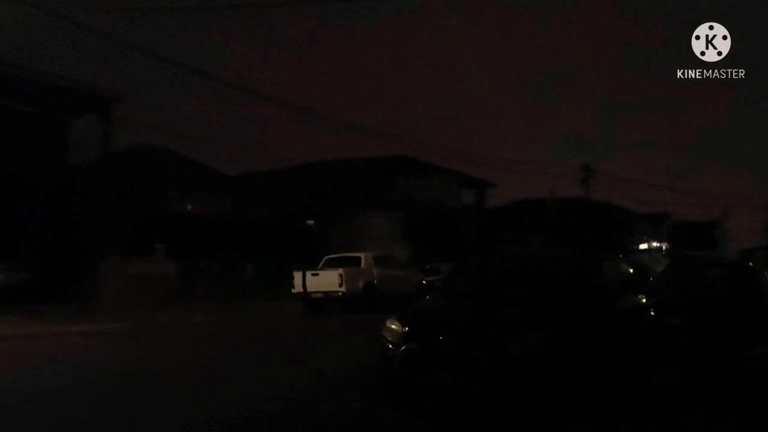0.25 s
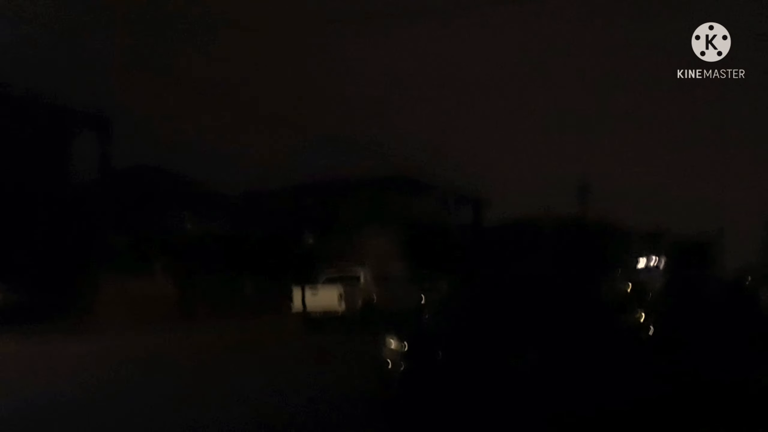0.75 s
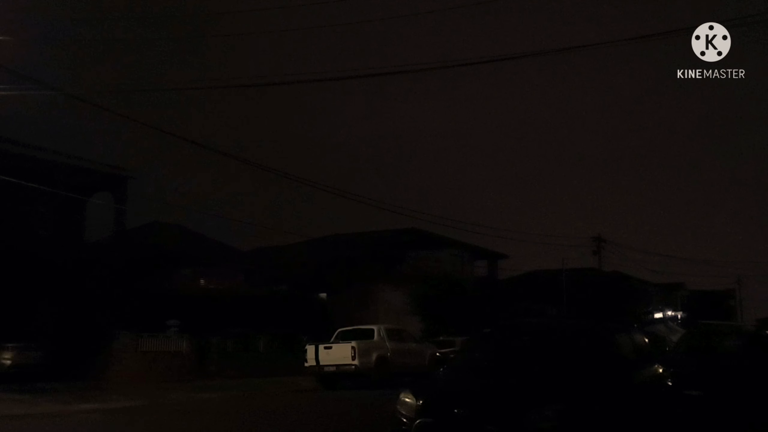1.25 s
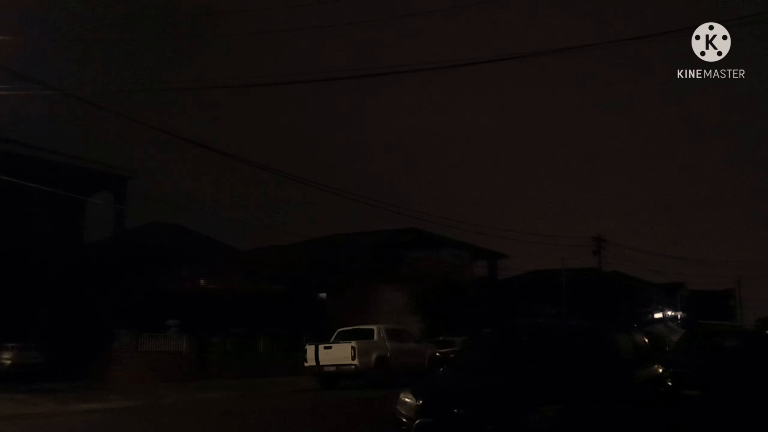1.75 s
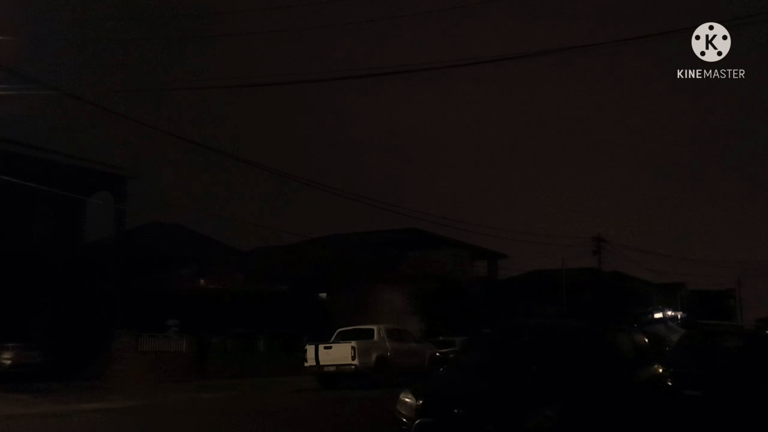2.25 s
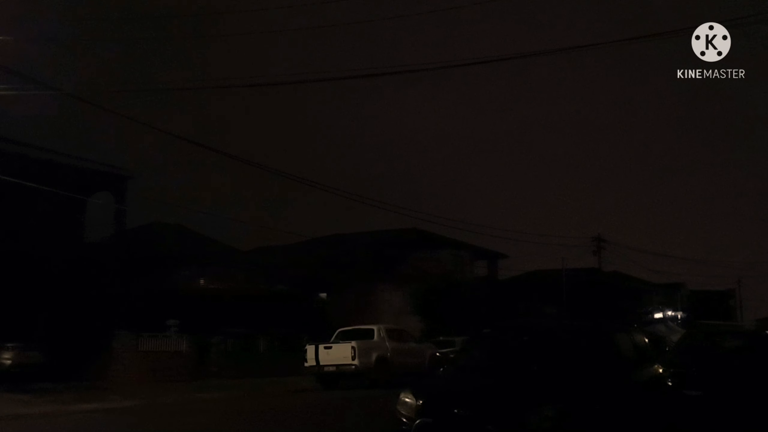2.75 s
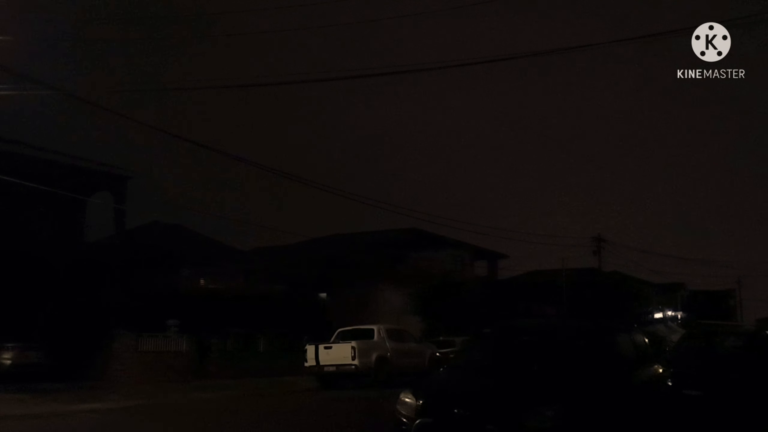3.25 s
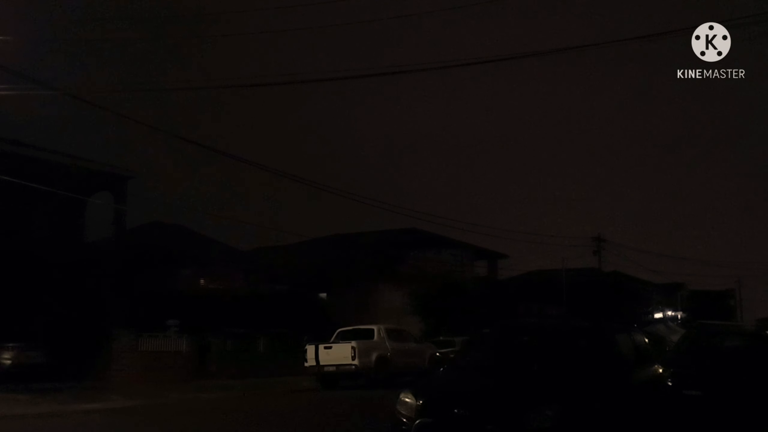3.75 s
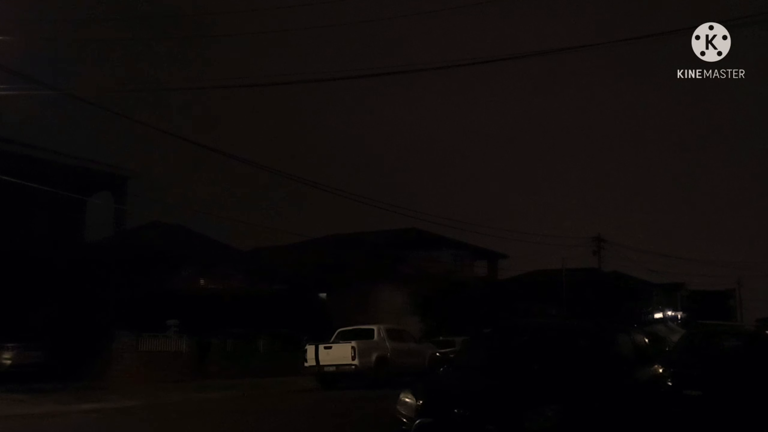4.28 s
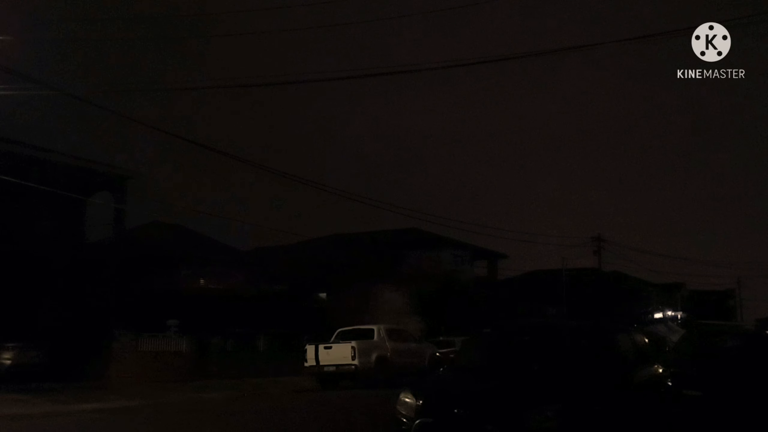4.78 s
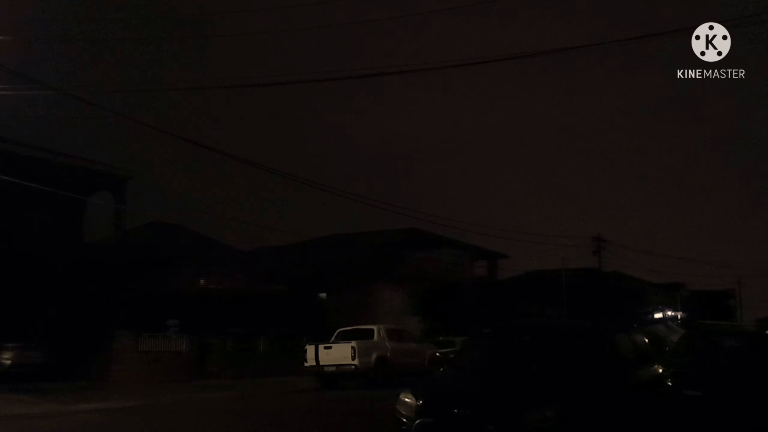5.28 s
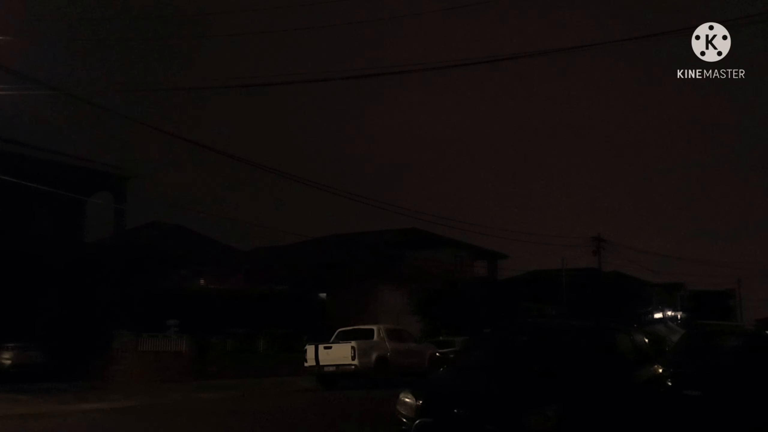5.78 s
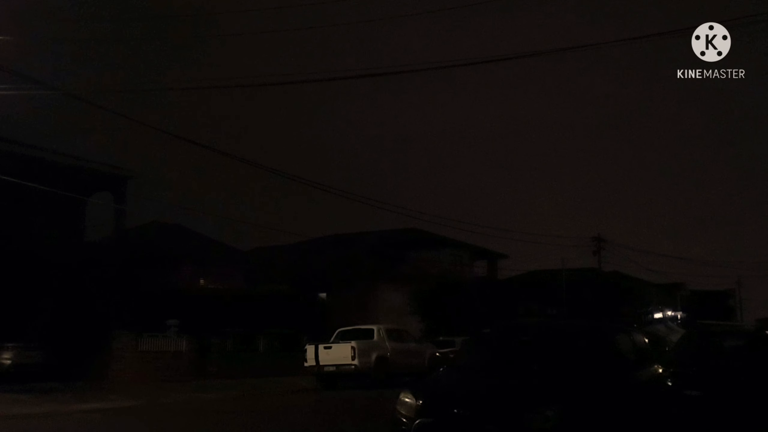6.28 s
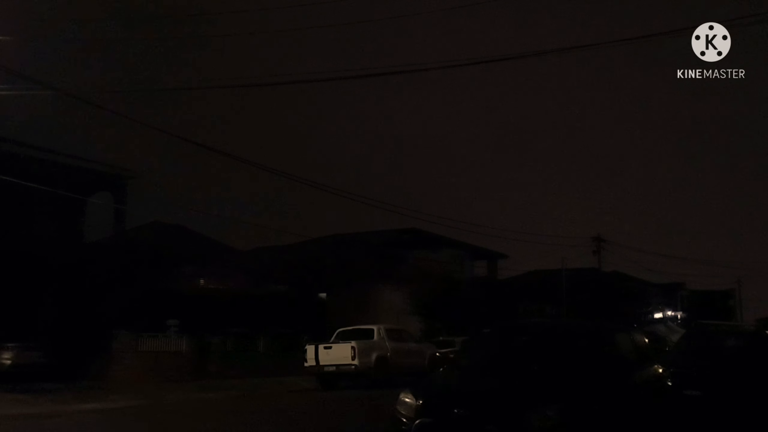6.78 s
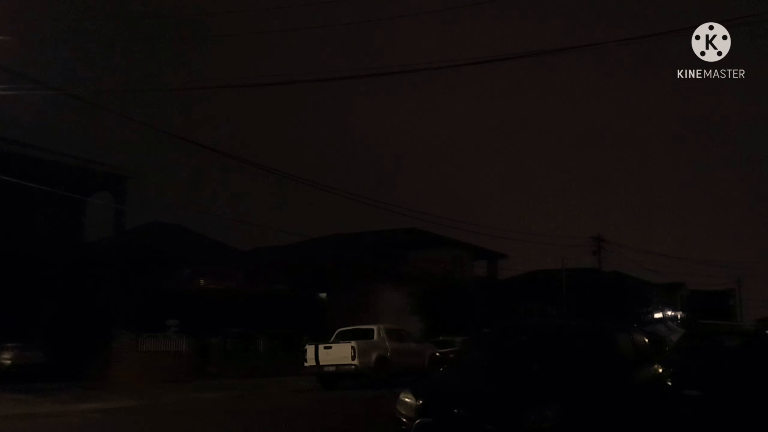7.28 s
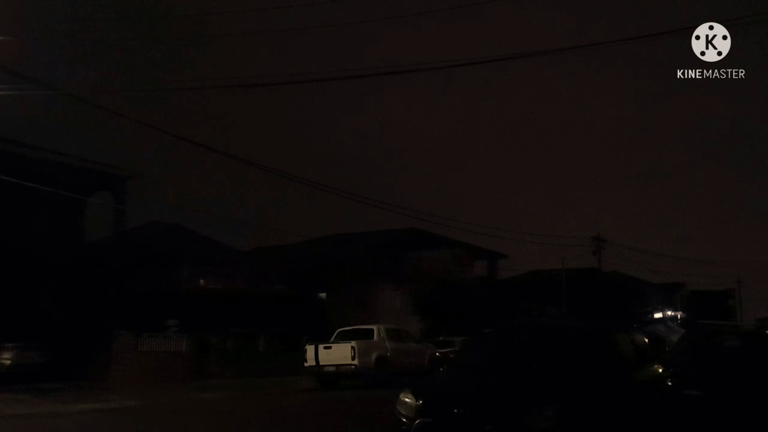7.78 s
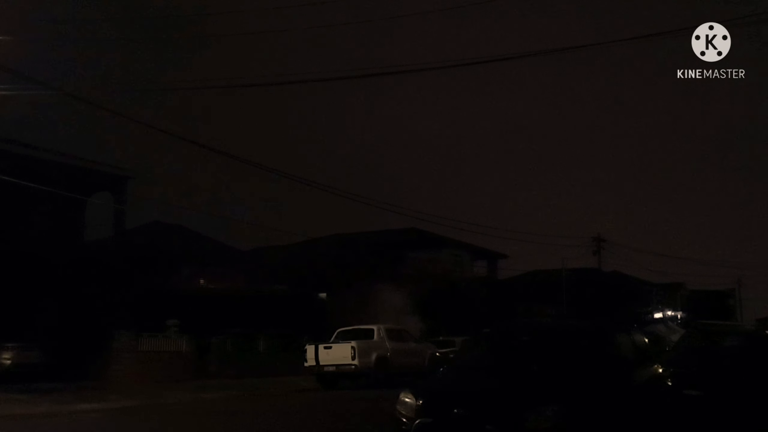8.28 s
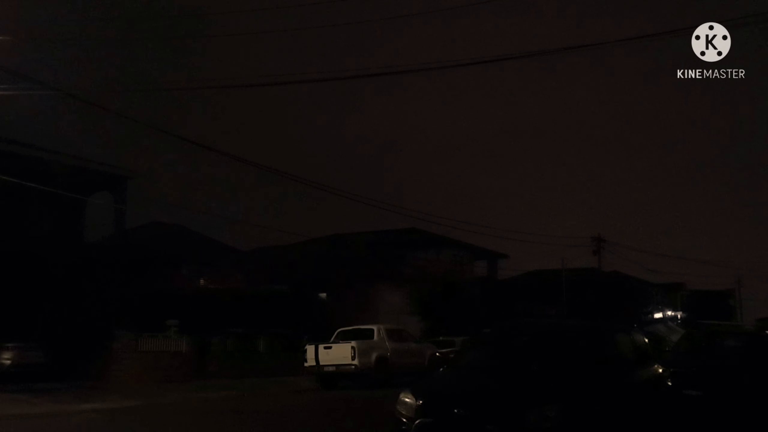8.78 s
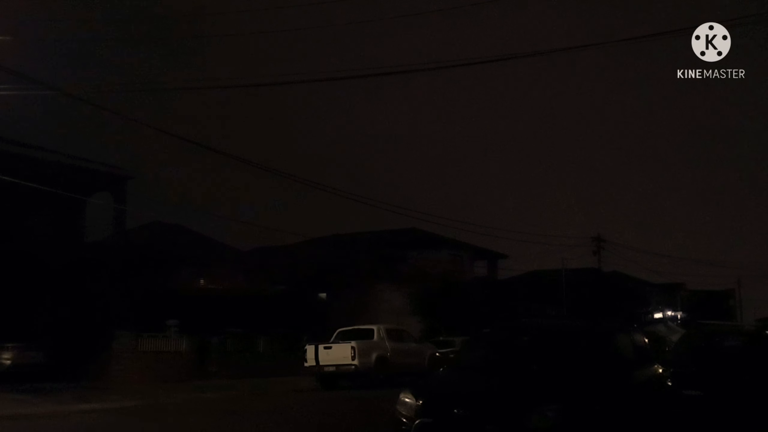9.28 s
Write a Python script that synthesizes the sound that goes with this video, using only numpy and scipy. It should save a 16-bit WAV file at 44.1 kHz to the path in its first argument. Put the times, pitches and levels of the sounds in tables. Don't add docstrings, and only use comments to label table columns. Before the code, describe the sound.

Fat raindrops knock on a thin roof close overhead while distant thunder swells, booms deeply and rolls away over a quiet night street.

```python
import sys
import numpy as np
from scipy import signal
from scipy.fft import rfft, irfft, next_fast_len
from scipy.io import wavfile
from scipy.ndimage import uniform_filter1d

SR = 44100
rng = np.random.default_rng(int(sys.argv[2]) if len(sys.argv) > 2 else 0)


def invert_db(x):
    u = np.asarray(x, float) / 20
    return 10 ** u


def int16_out(signal):
    q = np.round(np.clip(np.atleast_2d(signal).T, -1, 1) * 32767)
    wavfile.write(sys.argv[1], SR, q.astype(np.int16))


N = 420273
TIME = np.arange(N) / SR


def thunder():
    # [hz, level_db per Hz]
    deep_colour = [(15, -18), (25, -79), (47, -2), (70, 1.5), (130, -2), (215, -7.5), (280, -38),
                   (470, -120)]
    chest_colour = [(130, -12.5), (215, -16.5), (237, -9.5), (274, 1.5), (317, 3), (400, -17.5), (520, -34),
                    (880, -120)]
    growl_colour = [(240, -16), (400, -2.5), (450, 2), (571, -8.5), (797, -19), (1100, -55), (1430, -106),
                    (2420, -120)]
    deep_gain, chest_gain, growl_gain = swells()
    deep = colour(ports(lambda: scatter(900, 2.5), -9), deep_colour)
    chest = colour(ports(lambda: scatter(1200, 2.5), -11), chest_colour)
    growl = colour(ports(lambda: scatter(1500, 4.1), -3.5), growl_colour)
    roll = deep_gain * even(deep, .04, .55)
    roll += chest_gain * even(chest, .03, .55)
    return roll + growl_gain * invert_db(2.5) * even(growl, 0.23, 0.076)


def swells():
    # [time_s, deep_db]
    bed = [(0, -57.5), (1.26, -58), (1.73, -52), (2.3, -46.5), (3.05, -50), (3.57, -48), (3.8, -58),
           (4.4, -39), (5.0, -32.5), (5.56, -32.5), (5.78, -37.5), (6.1, -28.5), (6.41, -42), (7.5, -35.5),
           (8.05, -30.5), (8.76, -34.5), (9.11, -41.5), (9.53, -45.5)]
    # [peak_s, chest_db, length_s, deep_minus_chest_db]
    booms = [(0.032, -53, 0.016, -5), (1.433, -55, 0.11, 6.5), (1.929, -36.5, 0.055, -3),
             (2.078, -30.5, 0.019, -4), (2.172, -37, 0.058, -2.5), (2.67, -41, 0.12, -7),
             (2.967, -46, 0.1, -19), (3.22, -41.5, 0.074, -3), (3.69, -48.5, 0.063, 8.5),
             (3.952, -39, 0.22, 1.5), (4.246, -31.5, 0.07, -27), (4.667, -36, 0.063, -14),
             (4.905, -33, 0.057, -18), (5.18, -35, 0.16, -19), (5.418, -32, 0.038, -18),
             (5.622, -30, 0.044, -0.5), (5.819, -25, 0.0068, -22), (5.882, -23.5, 0.02, -7),
             (5.985, -26.5, 0.071, -4), (6.233, -25, 0.14, -1), (6.534, -24.5, 0.1, 1.5),
             (6.676, -28.5, 0.081, -3), (6.775, -29, 0.075, 2.5), (7.08, -29.5, 0.35, 1),
             (7.252, -27, 0.083, 0), (7.374, -30, 0.053, -7), (7.592, -30.5, 0.073, 7),
             (7.836, -34.5, 0.15, 6.5), (8.245, -32.5, 0.088, 3), (9.23, -37.5, 0.082, -0.5)]
    rise_share = 0.56
    loud_db = -32
    chest_law, growl_law = (-35, 1.28), (-41.5, 0.84)
    bed_db = curves(bed)
    deep_power = invert_db(2 * bed_db)
    chest_power = invert_db(2 * follow(bed_db, chest_law, loud_db))
    for peak_s, chest_db, length_s, deep_db in booms:
        width_s = np.where(TIME < peak_s, rise_share * length_s, length_s)
        shape = np.exp(-((TIME - peak_s) / width_s) ** 2)
        deep_power = deep_power + invert_db(2 * (chest_db + deep_db)) * shape
        chest_power = chest_power + invert_db(2 * chest_db) * shape
    growl = invert_db(follow(10 * np.log10(chest_power), growl_law, loud_db))
    return np.sqrt(deep_power), np.sqrt(chest_power), growl


def fronts():
    # [time_s, peak_db]
    shocks = [
        (5.661, -15.5),
        (5.897, -17.5),
        (6.525, -13),
        (6.564, -13.5),
        (6.775, -19.5),
        (7.268, -15),
        (7.327, -15),
        (7.63, -18),
        (8.24, -12.5),
    ]
    pitch_hz, cycles = 85, 0.74
    out = 0
    for s, db in shocks:
        away = TIME - s
        out = out + invert_db(db) * np.cos(2 * np.pi * pitch_hz * away) * np.exp(-(away * pitch_hz / cycles) ** 2)
    return out


def roof(patter, fat):
    out = np.zeros((2, N + 8192))
    small = rng.random((780, 3))
    at = small[:, 0] * (N - 1)
    thrown_s = np.array(fat)[:, 0] + .012 + .05 * small[:len(fat), 0]
    at[:len(fat)] = np.minimum(thrown_s * SR, N - 1)
    small_db = 20 * np.log10(patter[at.astype(int)]) + 14 + 6 * small[:, 1] ** 2
    small_hz = 700 + 2300 * small[:, 2] ** 2
    small_drops = zip(at / SR, small_db, small_hz, np.full(len(at), -14), np.full(len(at), -12))
    for s, db, hz, tick_db, thud_db in [*small_drops, *fat]:
        chance = rng.standard_normal(10)
        left, right = invert_db(db + 2.5) * shelter(knock(hz, tick_db, thud_db, chance))
        pan_db = 1.0 + 1.7 * chance[-1]
        lag = int(np.clip(4 + 3 * chance[-2], 0, 12))
        i = int((s + .0001) * SR)
        out[0, i + lag:i + lag + len(left)] += left * invert_db(pan_db / 2)
        out[1, i:i + len(left)] += right * invert_db(-pan_db / 2)
    add_sprays(out)
    return out[:, :N]


def knock(hz, tick_db, thud_db, chance):
    # [pitch_hz, level_db, t60_s]
    skin = [(1170, 23.5, 0.0013), (2066, -6, 0.01)]
    # [pitch_hz, level_db, t60_s]
    panel = [(343.4, -3, 0.056), (611, -2.5, 0.022)]
    t = np.arange(2048) / SR
    cycles = t * hz / .48

    def rings(modes, vary):
        total = 0
        for k, (f, db, t60) in enumerate(modes):
            total = total + invert_db(db + 2.2 * vary[k]) * ring(f * (1 + .06 * vary[k + 2]), t60, size=2048)
        return np.tanh(cycles) ** 2 * total

    body = np.sin(2 * np.pi * hz * t) * cycles * np.exp(1 - cycles) + rings(skin, chance)
    tick = (rng.standard_normal(2048) + 3 * (t == 9 / SR)) * 1000 ** (-t / .007)
    tick = dull(dull(tick - dull(tick, 2000), 5500), 9000)
    out = body / np.max(np.abs(body))
    out = out + invert_db(tick_db + 6) * tick / np.max(np.abs(tick))
    return out + invert_db(thud_db + 1.5) * rings(panel, chance[4:])


def ring(hz, t60, size):
    t = np.arange(size) / SR
    return np.sin(2 * np.pi * hz * t) * 1000 ** (-t / np.maximum(t60, 1e-3))


def add_sprays(out):
    burst_s = [
        1.433,
        1.458,
        1.471,
        2.087,
        2.135,
        3.166,
        8.114,
    ]
    # [level_db, t60_s, top_hz]
    bursts = [
        (-21, 0.16, 1350),
        (-24.5, 0.15, 1300),
        (-28, 0.097, 2200),
        (-30, 0.094, 2400),
        (-17, 0.066, 1200),
        (-31, 0.29, 3600),
        (-15.5, 0.19, 1260),
    ]
    t = np.arange(8192) / SR
    for s, (db, t60, top_hz) in zip(burst_s, bursts):
        fizz = bandpass(rng.standard_normal((2, 8192)), 1, 900, top_hz)
        fizz *= invert_db(34 * uniform_filter1d(rng.standard_normal(8192), 64))
        i = int(s * SR)
        out[:, i:i + 8192] += invert_db(db) * fizz * np.minimum(t / 0.0033, 1) * 1000 ** (-t / t60)


def shelter(sound):
    # [delay_s, level_db]
    echoes = [
        (.0073, -9),
        (.0115, -17),
    ]
    tail_db, tail_t60_s, tail_top_hz = -13, .1, 4000
    t = np.arange(3072) / SR
    tail = invert_db(tail_db) * rng.standard_normal((2, 3072)) * 1000 ** (-t / tail_t60_s)
    response = tail * np.minimum(t / 0.00032, 1) / 10
    for s, db in echoes:
        response[:, int(s * (1 + .04 * rng.standard_normal()) * SR)] += invert_db(db + 2 * rng.standard_normal())
    response = dull(response, tail_top_hz)
    response[:, 0] += 1
    return signal.fftconvolve(sound[None], response, axes=1)


def drizzle(hiss):
    # [hz, level_db per Hz]
    hiss_colour = [(530, -13), (900, 1), (1300, 1.5), (2000, 2), (2600, -1), (3080, 1), (4730, -9),
                   (6080, 1), (9340, -14), (11200, -10), (15600, -10)]
    grain = colour(np.array([scatter(15000, 3.48), scatter(15000, 3.63)]), hiss_colour)
    out, gust_db = 0, .8 * walk(8)
    for hz, lean_db in [(800, .8), (1600, 1.5), (3200, -5), (6400, 10), (10000, 4)]:
        band = bandpass(grain, 2, hz, min(2 * hz, 17000))
        flicker_db = (.8 + 900 / hz) * walk(18)
        out = out + band * invert_db(gust_db + flicker_db + lean_db * np.array([[.5], [-.5]]))
    return out * hiss * invert_db(4.0)


def cricket():
    chirp_s = [
        .5,
        .562,
        .638,
        .742,
        .83,
    ]
    gate = sum(np.exp(-((TIME - s) / 0.012) ** 2) for s in chirp_s)
    return invert_db(-69) * gate * np.sin(2 * np.pi * 5880 * TIME) * np.array([[1], [.5]])


def scatter(rate, spread_db):
    where, size, sign = rng.random((3, int(rate * N / SR)))
    height = invert_db(-spread_db * np.log(1.002 - size)) * np.sign(sign - .5)
    return np.bincount((where * N).astype(int), height, N)


def ports(source, side_db):
    side = source()
    return source() + invert_db(side_db) * (side - dull(side, 250)) * np.array([[1], [-1]])


def colour(x, points):
    size = next_fast_len(N)
    hz, db = np.transpose(points)
    octave = np.log2(np.maximum(np.fft.rfftfreq(size, 1 / SR), 1))
    below = np.maximum(np.log2(hz[0]) - octave, 0)
    above = np.maximum(octave - np.log2(hz[-1]), 0)
    gain = invert_db(np.interp(octave, np.log2(hz), db) - 60 * (below + above))
    return unit(irfft(rfft(x, size) * gain, size)[..., :N])


def even(x, span_s, share):
    power = uniform_filter1d(np.mean(x ** 2, axis=0), int(span_s * SR))
    return unit(x / power ** (share / 2))


def unit(x):
    return x / np.sqrt(np.mean(x ** 2))


def dull(x, hz):
    g = np.tan(np.pi * hz / SR)
    return signal.lfilter([g, g], [1 + g, g - 1], x)


def bandpass(x, order, lo_hz, hi_hz):
    return signal.sosfilt(signal.butter(order, [lo_hz, hi_hz], "band", fs=SR, output="sos"), x)


def walk(rate):
    k = int(SR / rate)
    held = np.repeat(rng.standard_normal(N // k + 1), k)
    return np.sqrt(2) * uniform_filter1d(uniform_filter1d(held, k), k)[:N]


def curves(table):
    return np.interp(TIME, *np.transpose(table))


def follow(db, law, from_db):
    return law[0] + law[1] * (db - from_db)


def scene():
    # [time_s, hiss_db]
    rain = [(0, -67), (.3, -70), (.7, -66.5), (1.25, -69.5), (1.36, -60), (1.7, -58.5), (2.2, -56.5),
            (4.5, -57), (4.85, -54), (5.2, -57.5), (6.3, -54), (7.7, -56), (9.0, -56), (9.53, -59)]
    # [centre_s, depth_db, length_s]
    lulls = [
        (0.303, -12, 0.041),
        (0.884, -8, 0.039),
        (2.886, -13.5, 0.39),
        (5.204, -14, 0.31),
        (7.823, -3, 0.57),
        (9.2, -4, 0.97),
    ]
    # [start_s, peak_db, pitch_hz of the struck spot, tick_minus_peak_db, thud_minus_peak_db]
    first_drops = [(0.0133, -35.5, 1020, -21, -24), (0.0321, -28.5, 1370, -33, -9),
                   (0.0665, -41, 1080, -25, -12), (0.0801, -36.5, 1430, -15, -5.5),
                   (0.0895, -32.5, 1170, -26, -28), (0.1045, -49, 1220, -6, -22),
                   (0.1333, -46, 1230, -28, -24), (0.1477, -34, 960, -18, -23),
                   (0.191, -37.5, 1240, -30, -29), (0.3461, -56, 1100, -6, -16),
                   (0.3526, -46, 1330, -21, -22), (0.3768, -27.5, 940, -26, -15),
                   (0.4462, -42, 940, -15, -22), (0.5099, -51, 970, -6, -14), (0.5176, -27, 1500, -30, -19),
                   (0.5677, -43, 1130, -23, -22), (0.617, -34.5, 1030, -18, -25),
                   (0.7723, -40.5, 1000, -23, -25), (0.824, -43, 1020, -12, -8),
                   (0.9156, -66, 1330, -20, -22), (0.9279, -47, 1140, -21, -19),
                   (0.9656, -35.5, 1330, -20, -15), (0.9876, -31.5, 960, -13.5, -9),
                   (1.0125, -41, 1670, -14, -22), (1.077, -45, 1060, -9, -19),
                   (1.0931, -37, 1070, -19, -24), (1.1084, -36, 1090, -25, -12),
                   (1.1226, -31.5, 1380, -20, -19), (1.157, -33.5, 1110, -31, -20),
                   (1.1777, -37, 1030, -19, -18), (1.2127, -40, 1770, -19, -19),
                   (1.2679, -44, 1120, -9, -16), (1.3006, -37, 1340, -18, -12),
                   (1.3244, -31, 1330, -27, -22), (1.3824, -30, 905, -18, -9),
                   (1.4033, -29.5, 1180, -16, -27), (1.4339, -35, 1390, -17, -4.5),
                   (1.5023, -30, 1710, -15, -19)]
    early_drops = [(1.571, -50, 950, -19, -13), (1.615, -63, 1680, -14, -20),
                   (1.6616, -34.5, 1270, -7, -24), (1.6992, -34, 1320, -12, -23),
                   (1.7766, -31.5, 1070, -12, -6), (1.9043, -37, 980, -10, -11),
                   (1.923, -20.5, 950, -15.5, -5), (1.98, -49, 1190, -7, 1), (2.0498, -47, 1440, -15, -22),
                   (2.0688, -26, 1500, -11, -5.5), (2.0866, -19, 1260, -18, -33),
                   (2.134, -18, 1190, -12.5, -9), (2.1508, -22.5, 1280, -26, -2),
                   (2.1697, -27.5, 1200, -16, -22), (2.2024, -25.5, 1430, -16, -16),
                   (2.2882, -36, 1140, -16, -4), (2.3032, -30.5, 1360, -18, -18),
                   (2.3252, -43, 1230, -12, -22), (2.3433, -34.5, 1070, -9, -4),
                   (2.3628, -42, 1230, -21, 0), (2.3835, -31, 1600, -1.5, -22),
                   (2.4544, -32, 1280, -11, -22), (2.465, -28.5, 1000, -14, -12),
                   (2.4866, -27, 1080, -9.5, -23), (2.4936, -28.5, 810, -15, -6),
                   (2.5218, -19, 1330, -21, -13.5), (2.602, -28.5, 1490, -17, -11),
                   (2.7416, -45, 1340, -11, 1), (2.81, -25, 1310, -16, -6),
                   (2.8634, -22.5, 1440, -19, -5.5), (2.8708, -24, 1000, -23, -27),
                   (2.9173, -37.5, 1540, -11, -22), (2.948, -20.5, 990, -12, -6),
                   (3.1113, -42, 1150, -8, 3), (3.13, -28.5, 1170, -15, -11), (3.166, -29, 1320, -4, -25),
                   (3.2331, -21.5, 1750, -17, -7), (3.24, -24.5, 1250, -20, -27)]
    middle_drops = [(3.2718, -33, 1060, -12, -8), (3.334, -31.5, 1710, -13, -11), (3.4, -37, 1020, -9, -19),
                    (3.4524, -40, 1040, -19, -20), (3.4734, -26.5, 1290, -18.5, -11),
                    (3.492, -31, 1330, -16, -11), (3.504, -33.5, 1170, -4.5, -16),
                    (3.5451, -33, 1320, -10.5, -15), (3.6095, -33, 1130, -20, -27),
                    (3.6524, -41, 1110, -18, -22), (3.668, -23, 930, -16, -3.5),
                    (3.745, -31, 1420, -14, -7), (3.855, -29.5, 1040, -11.5, 1.5),
                    (3.877, -24.5, 1200, -11, -29), (3.9262, -28.5, 1050, -13, -25),
                    (3.9562, -34, 940, -9, -13), (4.0222, -30.5, 1400, -19, -2),
                    (4.0403, -32, 1300, -12, -15), (4.0613, -31.5, 1610, -16, -24),
                    (4.0972, -34, 1040, -11, -7), (4.133, -28, 1450, -19, -14),
                    (4.2075, -45, 1100, -10, -22), (4.279, -23.5, 920, -12.5, -0.5),
                    (4.3288, -27, 1370, -18, -10), (4.3632, -43, 1240, -6, -22),
                    (4.3762, -48, 1290, -11, -22), (4.423, -40.5, 1450, -15, 5),
                    (4.4293, -36, 1220, -21, -20), (4.4432, -30.5, 980, -13, 0), (4.52, -42, 1740, -24, -7),
                    (4.5288, -21, 1680, -17.5, -10), (4.6444, -28.5, 1250, -38, -13),
                    (4.66, -35, 1480, -15, -13), (4.72, -34, 1180, -25, -1), (4.7286, -33, 980, -13, -15),
                    (4.7594, -29, 1510, -10, -22), (4.8807, -22.5, 970, -16, 0.5),
                    (5.0158, -36, 940, -9, 5.5)]
    late_drops = [(5.3377, -41.0, 1240, -11, -22), (5.3453, -36, 1280, -8, -22),
                  (5.3964, -30.5, 1180, -12, -14), (5.403, -28.5, 970, -14, -12),
                  (5.43, -29, 1680, -14, -20), (5.562, -39.5, 1520, -4, -20),
                  (5.6688, -39.5, 1160, -11, -22), (5.7713, -61, 1000, -15, -22),
                  (5.7882, -51, 1020, -7, -22), (5.824, -22, 1060, -11, -3.5),
                  (5.855, -16.5, 990, -15.5, -8.5), (5.8816, -17.5, 1640, -19.5, -28),
                  (5.934, -32, 1190, -28, -22), (5.9802, -28, 1170, -7, -19), (6.028, -37, 920, -17, -2),
                  (6.1107, -30, 1200, -15, -10), (6.1163, -20, 1010, -16.5, -1),
                  (6.1485, -31.5, 880, -3.5, -24), (6.187, -22, 920, -22, -12),
                  (6.2527, -24, 1300, -19, -22), (6.374, -29.5, 1430, -12, -3), (6.409, -43, 1030, -18, 2),
                  (6.4732, -41, 950, -15, -22), (6.4833, -31, 850, -13, -22),
                  (6.5147, -29.5, 990, -10.5, 8.5), (6.5303, -27, 920, -19, 4.5),
                  (6.6487, -31.5, 970, -12, 2), (6.6886, -28.5, 1520, -12, -20),
                  (6.7991, -21, 880, -14.5, -12), (6.8386, -33, 880, -12, -22),
                  (6.922, -27.5, 1170, -14.5, -12), (6.955, -38, 1210, -14.5, -20),
                  (7.0089, -36, 930, -15, 5), (7.03, -34, 1020, -18, -22), (7.0491, -29.5, 990, -12, -2),
                  (7.073, -31, 850, -11.5, -9), (7.1058, -37, 1060, -23, -22), (7.15, -41, 1300, -22, -22)]
    last_drops = [(7.195, -38, 1130, -13, -22), (7.219, -35, 1100, -11, 5), (7.3274, -36.5, 990, -8, -22),
                  (7.3734, -22.5, 960, -16, -9), (7.4193, -25, 1260, -17, -5),
                  (7.5954, -39.5, 1110, -9, -22), (7.7581, -21.5, 940, -24, 2), (7.8146, -33, 900, -15, -6),
                  (7.9776, -58, 890, -6, -22), (8.011, -59, 1370, -4, -5), (8.1148, -23, 955, -22, 4),
                  (8.175, -22, 1680, -18, -24), (8.3074, -39, 1090, -6, -19), (8.336, -33, 960, -11, -12),
                  (8.349, -35, 1000, -8, -8), (8.42, -38.5, 980, -8, -22), (8.4603, -36.5, 1360, -5, -22),
                  (8.526, -41.5, 1070, -7, -22), (8.5588, -41, 1250, -12, -25),
                  (8.5893, -33.5, 1120, -26, -9), (8.6251, -29.5, 1020, -7.5, -12),
                  (8.7083, -38.5, 1070, -2, 2), (8.7396, -33, 1170, -12, -2), (8.7894, -46, 1130, -9, -22),
                  (8.8387, -54, 960, -19, -22), (8.8859, -24, 1250, -22, -23),
                  (8.9124, -27.5, 1010, -12.5, -4.5), (9.1358, -37, 1140, -17, -7),
                  (9.177, -49, 1400, -23, -22), (9.192, -31.5, 1030, -29, -20),
                  (9.298, -31.5, 1060, -18, -4), (9.3085, -24, 800, -23, -8), (9.326, -30, 930, -22, -16),
                  (9.3646, -32.5, 1150, -22, -8), (9.3785, -27.5, 1470, -35, -24),
                  (9.4563, -30.5, 1070, -14, -27), (9.4824, -24, 1070, -16.5, -4.5),
                  (9.5259, -42, 1430, -10, -20)]
    further_drops = [(0.11, -42, 1600, -13, -13), (.212, -39.5, 1019, -13, -25),
                     (0.6897, -32.5, 1210, -17, -34), (1.9, -30.5, 930, -8, -18), (1.853, -34, 1200, -14, -9),
                     (2.4, -34, 740, -5, -18), (3.76, -29, 1530, -14, -20), (4.272, -40, 1500, -14, -22),
                     (6.8, -32.5, 1512, -14, -12), (7, -28.5, 1620, -15, -23), (6.564, -34, 1260, -3, -20),
                     (4.7, -34, 1111, -7, -20), (7.347, -31, 1200, -10, -15), (8.135, -19.5, 1185, -23, -34),
                     (8.282, -37, 1100, -9, -20)]
    fat = first_drops + early_drops + middle_drops + late_drops + last_drops + further_drops
    rain_db = curves(rain)
    lull_db = sum(db * np.exp(-((TIME - s) / length) ** 2) for s, db, length in lulls)
    patter = invert_db(follow(rain_db, (-59, 0.67), -57) + lull_db)
    return thunder() + fronts() + roof(patter, fat) + drizzle(invert_db(rain_db)) + cricket()


def roll_off(x):
    return signal.sosfilt(signal.butter(12, 16660, fs=SR, output="sos"), x)


def record(dry):
    heard = signal.sosfilt(signal.butter(2, 32, "high", fs=SR, output="sos"), dry)
    heard = signal.sosfilt(signal.ellip(8, .2, 70, 15600, fs=SR, output="sos"), heard)
    for lo_hz, hi_hz, lean in [(3340, 14000, -0.21), (6060, 20000, 0.17)]:
        heard = heard + lean * bandpass(heard, 1, lo_hz, hi_hz) * np.array([[1], [-1]])
    return roll_off(heard)


dry = scene()
out = record(dry)
int16_out(out)
```